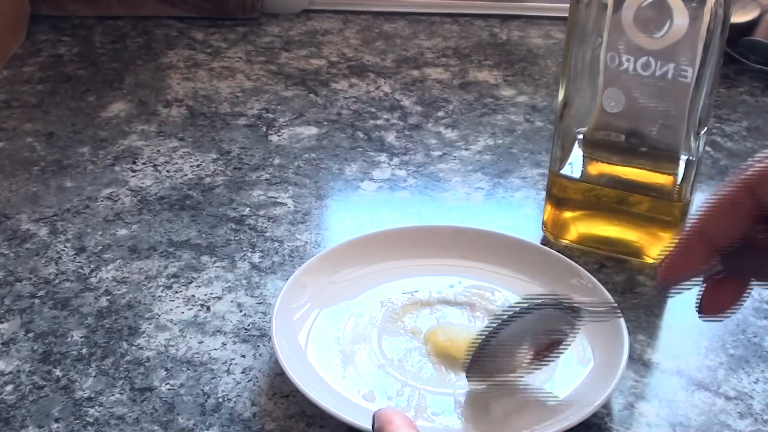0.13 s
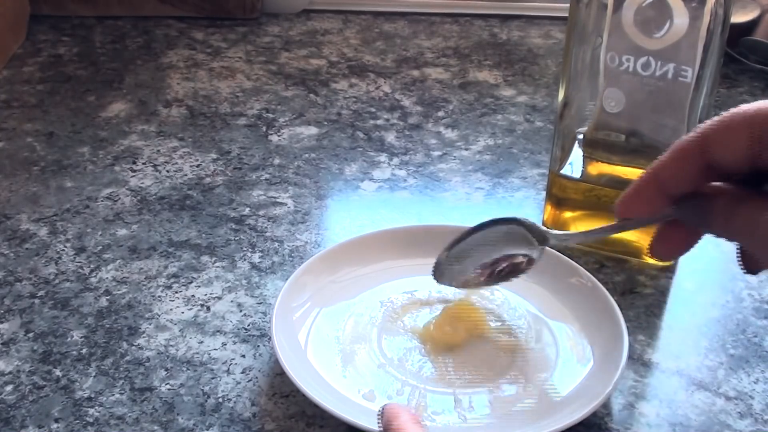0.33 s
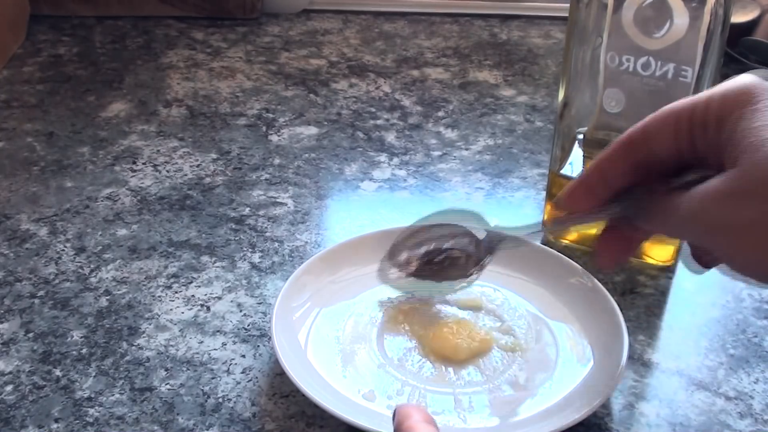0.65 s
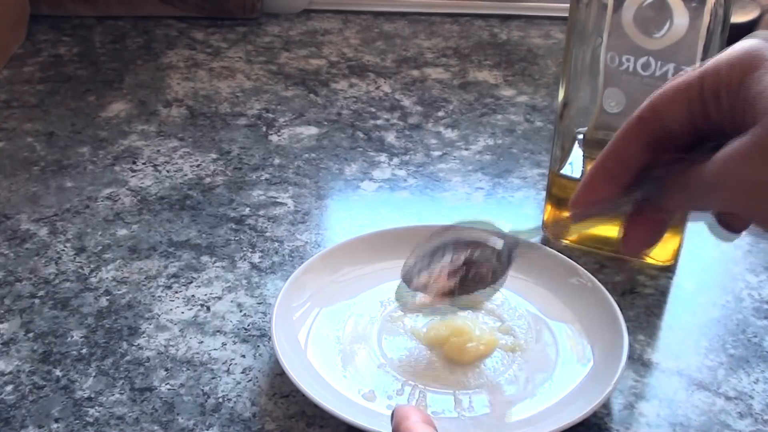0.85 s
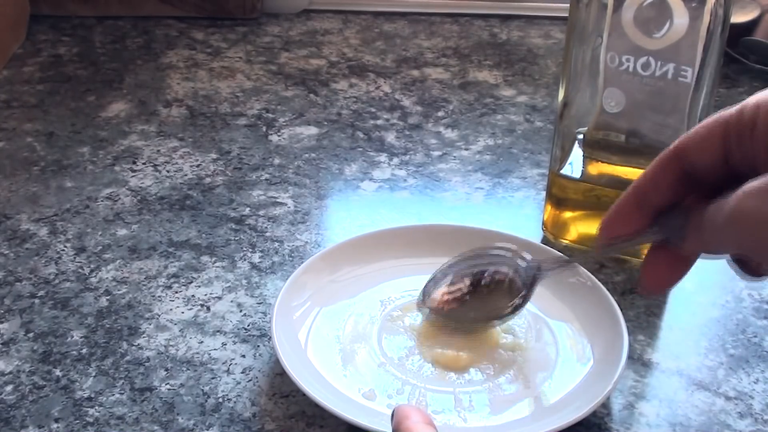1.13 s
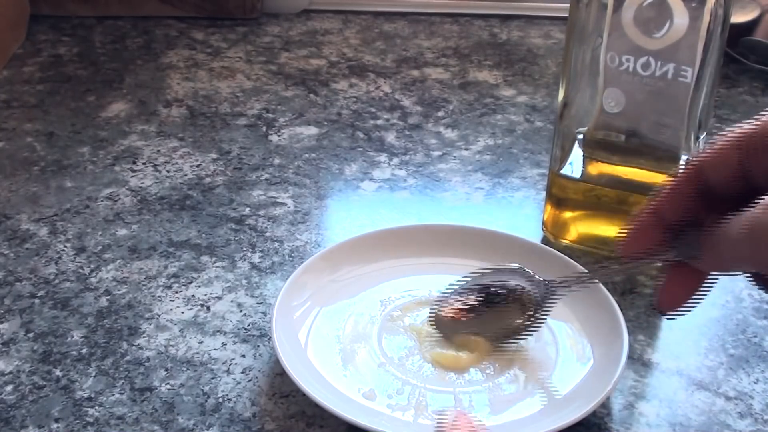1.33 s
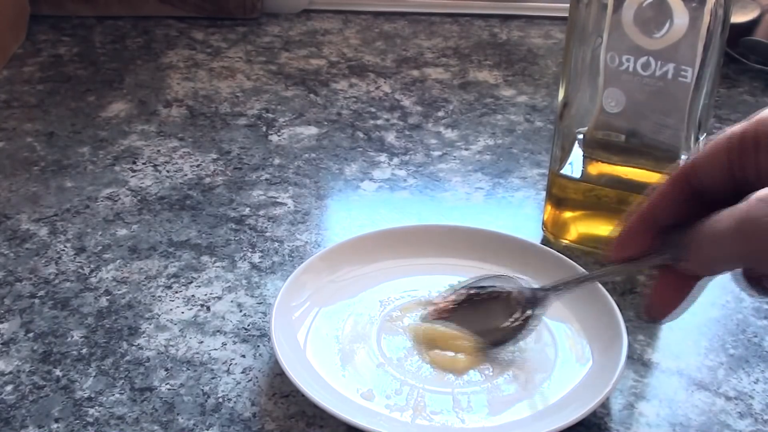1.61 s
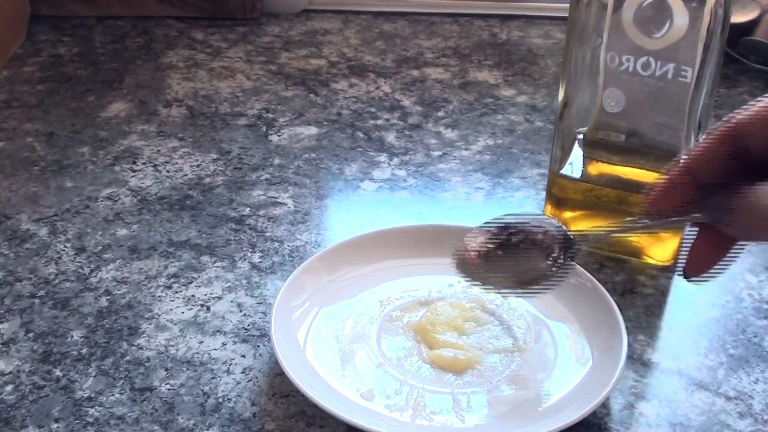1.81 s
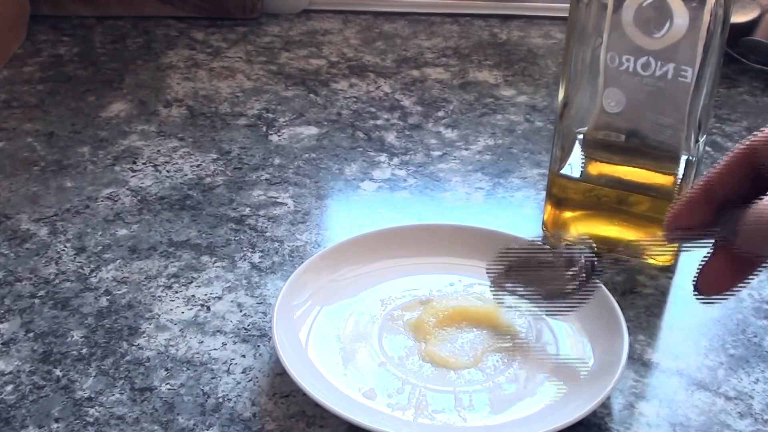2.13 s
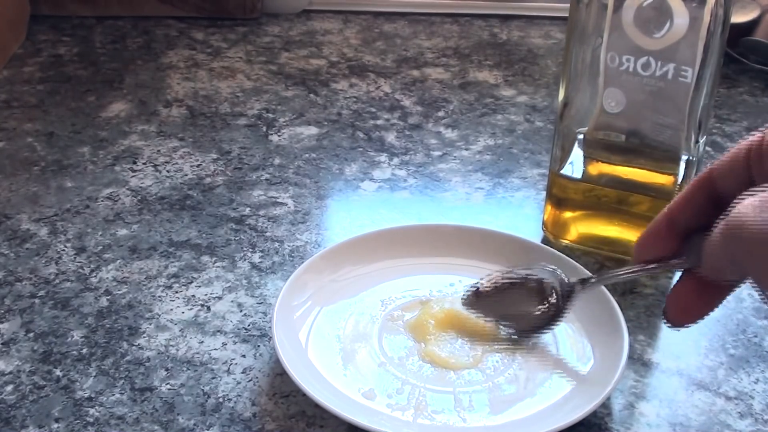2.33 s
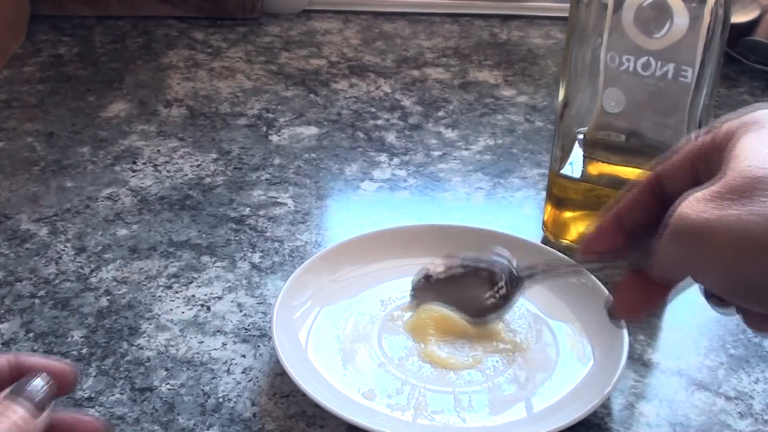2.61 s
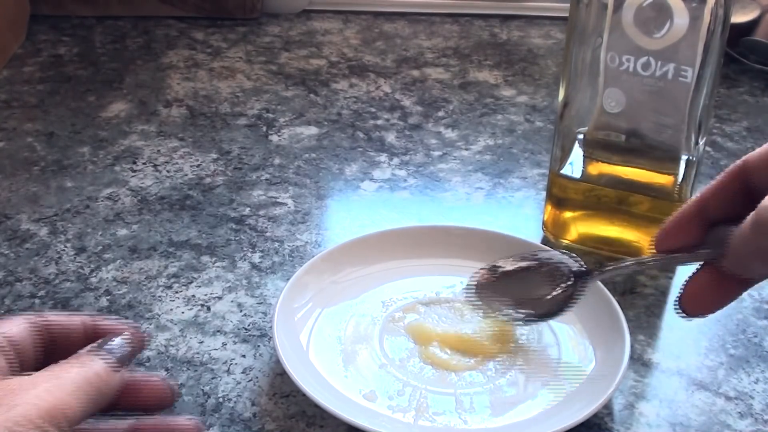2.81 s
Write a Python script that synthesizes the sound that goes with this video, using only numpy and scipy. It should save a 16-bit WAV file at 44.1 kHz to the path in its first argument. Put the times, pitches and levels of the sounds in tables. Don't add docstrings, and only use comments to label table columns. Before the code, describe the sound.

Steel spoon clicking and dragging across a small china saucer, smearing paste, close up

```python
import sys
import numpy as np
from scipy import signal
from scipy.fft import rfft, irfft
from scipy.io import wavfile
from scipy.ndimage import uniform_filter1d

SR = 44100
rng = np.random.default_rng(int(sys.argv[2]) if len(sys.argv) > 2 else 0)


def master_out(mix):
    frames = np.transpose(np.atleast_2d(mix))
    ceiling = np.clip(frames, -1, 1)
    pcm = np.round(ceiling * 32767).astype(np.int16)
    wavfile.write(sys.argv[1], SR, pcm)


def how_loud(loudness_db):
    steps = np.asarray(loudness_db, float) / 20
    return 10 ** steps


N = 130095
LEFT_RIGHT = np.array([[1], [-1]])


def level(x, rms_db):
    return x * how_loud(rms_db) / np.sqrt(np.mean(x ** 2))


def band(x, lo_hz, hi_hz):
    return signal.sosfilt(signal.butter(2, [lo_hz, min(hi_hz, SR / 2.1)], "band", fs=SR, output="sos"), x)


def mode(x, hz, t60_s):
    r = 1000. ** (-1 / (t60_s * SR))
    w = 2 * np.pi * hz / SR
    return signal.lfilter([0, 2 * np.sin(w) * np.sqrt(1 - r)], [1, -2 * r * np.cos(w), r * r], x)


def walk(rate_hz):
    hold = int(SR / rate_hz)
    return uniform_filter1d(np.repeat(rng.standard_normal(N // hold + 1), hold), hold)[:N]


def hump(start_s, length_s, rise):
    sag_db = 10
    u = (np.arange(N) / SR - start_s) / length_s
    rise = np.clip(rise, .02, .95)
    swell = np.clip(np.minimum(u / rise, (1 - u) / 0.26 + 1), 0, 1) ** 0.72
    return swell * how_loud(-sag_db * np.clip(u - rise, 0, 2))


# f/Hz, density/dB per Hz
KITCHEN_SPECTRUM = [(15, -48), (30, -29), (60, -13.5), (227, -1.5), (378, -6), (614, -15.5), (762, -13),
                    (1450, -22), (5730, -27), (15500, -33)]


def kitchen():
    hum_db, side_db = -45, -10.5
    log_hz = np.log(np.maximum(np.fft.rfftfreq(N, 1 / SR), 1))
    table = np.array(KITCHEN_SPECTRUM)
    shape = how_loud(np.interp(log_hz, np.log(table[:, 0]), table[:, 1], left=-70))
    mid, side = level(irfft(rfft(rng.standard_normal((2, N))) * shape, N), hum_db)
    return mid * how_loud(1.13 * walk(4.46)) + how_loud(side_db) * band(side, 400, 7900) * LEFT_RIGHT


def rubbing():
    grit_per_s, grit_spread_db, stutter_db = 6000, 1.6, 1.8
    hiss = rng.standard_normal(N)
    clicks = (rng.random(N) < grit_per_s / SR) * how_loud(grit_spread_db * rng.exponential(1, N)) * np.sign(hiss)
    return level(level(clicks, 0) + 0.54 * hiss, 0) * how_loud(stutter_db * walk(170))


# start t/s, length/s, level/dB, low share/dB, rise share of length
DRAGS = [(-.02, 0.12, -46, 9, .1), (0.201, 0.11, -22.5, -7.5, 0.35), (0.46, 0.023, -24.5, -8, 0.94),
         (0.491, 0.071, -30, -0.5, 0.21), (0.73, 0.095, -18, -5, 0.14), (0.85, 0.12, -49, 12, 0.076),
         (1.059, 0.02, -43.5, -10, 0.4), (1.073, 0.059, -39.5, -5, 0.14), (1.31, 0.055, -39.5, -10, 0.86),
         (1.379, 0.037, -44, 0, 0.63), (1.561, 0.11, -41, -4.5, 0.81), (2.032, 0.08, -41.5, -7.5, 0.18),
         (2.325, 0.056, -32, -3.5, 0.91), (2.638, 0.076, -28.5, -7.5, 0.19)]


def drags(rub):
    drag_db, low_share_db = -1.5, 4.5
    high, low = np.zeros(N), np.zeros(N)
    for start_s, length_s, db, low_db, rise in DRAGS:
        force = hump(start_s, length_s, rise) * how_loud(db + drag_db) * rub
        high += force
        low += force * how_loud(low_db + low_share_db)
    return high, low


# start t/s, length/s
ROCKS = [(-.02, .09), (.21, .09), (.21, .09), (-.02, .1), (.44, .095), (.745, .06), (.735, .1), (1.6, .075),
         (2.305, .09), (2.645, .055), (.21, .09), (.735, .1), (.735, .1), (-.02, .1)]
# level/dB, centre f/Hz
RUMBLES = [(-39, 1230), (-24, 2040), (-29.5, 3100), (-43, 1720), (-34.5, 620), (-32.5, 387), (-33, 1660),
           (-40, 770), (-36, 754), (-32, 795), (-32.5, 4230), (-36, 2600), (-37.5, 4460), (-47, 5400)]


def rocking(rub):
    out = np.zeros(N)
    for (start_s, length_s), (db, hz) in zip(ROCKS, RUMBLES):
        grind = band(hump(start_s, length_s, 0.24) * rub, hz * 0.6, hz * 1.59)
        out += how_loud(db + 14.0) * band(grind, hz * 0.61, hz * 1.504)
    return out


# t/s, level/dB, low share/dB, chatter/ms, ring/dB
TAPS = [(.2060, 2, -44, 4.1, 3.5), (.4382, 2, -21, 2.5, -18), (.4415, -1.5, -5, 2.6, 6),
        (.4762, 3.5, -20, 1.6, -4), (.4803, -1.5, -16, 4.2, 4), (.7303, -1.5, -26, 2.8, 0),
        (.8495, -1.5, -13, 3.1, -22), (1.0795, -7.5, -24, 4.1, -21), (1.083, -7.5, -8, 4.4, -0.5),
        (1.3445, -12, -27, 7.6, -18), (1.3525, -11.5, -9, 5.6, -26), (1.362, -12.5, -7.5, 3, -14),
        (2.3015, -10, -17, 4.7, 6), (2.3545, -10.5, -11, 2.2, -8), (2.3635, -6.5, -16, 1.8, -9),
        (2.379, -11, -12, 2.1, -13), (2.6262, -3, -19, 1.9, 5), (2.6498, -7.5, -6, 2, 11),
        (2.6605, -6.5, -20, 0.68, -16), (2.670, -7, -12, 2.5, 1)]
# t/s, level/dB, low share/dB, chatter/ms
TICKS = [(.2325, -24, -19, 2.3), (0.2543, -3.5, -7, 3.3), (0.2668, -7, -28, 8.2), (.3045, -14, -24, 1.1),
         (.5125, -34, -11, 1.5), (0.5269, -10.5, -13, 2.3), (1.196, -39, -20, 0.49),
         (1.6066, -18.5, -21, 3.3), (1.63, -19, 0, 0.92), (1.656, -21.5, -5, 2.9), (1.717, -25.5, -5, 0.63),
         (2.0472, -16.5, -31, .8), (2.127, -32, -19, 1.1), (2.307, -15, 1.5, 5.2), (2.3393, -23, -30, 1.1),
         (2.4322, -16, -40, 0.4), (2.4693, -33, -18, 1.1), (2.6805, -7, -4.5, 1.55), (2.694, -21, -12, 1.2),
         (2.845, -40, -18, .5), (0.8467, -4.5, -18, 1.1), (1.0975, -24, -2, 1.8)]


def strikes():
    tap_db, scatter_db, tick_ring_db, spots = -18.5, 3, -8, 30
    t = np.arange(int(.02 * SR)) / SR
    hits = []
    for s, db, low_db, chatter_ms, ring_db in list(TAPS) + [(*tick, tick_ring_db) for tick in TICKS]:
        spot_db = scatter_db * rng.standard_normal(spots)
        chatter = np.sign(rng.standard_normal(len(t))) * np.exp(-(t * 1000 / max(chatter_ms, .2)) ** 2)
        burst = (1.63 * (t == 0) + chatter) * how_loud(db + tap_db)
        hits.append((int(s * SR), burst, low_db, ring_db, spot_db))
    return hits


def drive(hits, drag, spot, low, tap_db, drag_db, ring=False):
    x = drag[low] * how_loud(drag_db)
    for start, burst, low_db, ring_db, spot_db in hits:
        gain_db = tap_db + spot_db[spot] + low * (low_db + 12)
        if ring:
            x[start] += 4 * burst[0] * how_loud(gain_db + ring_db)
        else:
            x[start:][:len(burst)] += burst * how_loud(gain_db)
    return x


# f/Hz, level/dB, t60/s
LOW_BODY = [(637, -24, 0.11), (783, -6.5, 0.051), (823, -6, 0.084), (1015, -9.5, 0.022),
            (1243, -7.5, 0.0082), (1456, -19, 0.057), (1850, -20, 0.09), (1805, -8, 0.038),
            (2220, -10, 0.0064), (2550, -14.5, 0.0055)]
# f/Hz, level/dB, t60/s
HIGH_BODY = [(4280, -6.5, 0.0024), (5490, -19, 0.02), (5780, -5.5, 0.026), (5817, 2.5, 0.024),
             (5920, 1, 0.0091), (6910, -3, 0.011), (7620, -8, 0.031), (8540, -2, 0.032), (9900, -14, 0.036),
             (11800, -39, .03)]


def body(hits, drag):
    out = np.zeros(N)
    for k, (hz, db, t60_s) in enumerate(LOW_BODY + HIGH_BODY):
        out += how_loud(db - 9) * mode(drive(hits, drag, k, int(hz < 3000), -5.5, 0), hz, t60_s)
    return out


# f/Hz, level/dB, t60/s
RINGS = [(3572, -13, .09), (3615, -16, .06), (5365, -19, .12), (6225, -21, .1), (7197, -18, .13),
         (9243, -22, .1), (1665, -15, .17)]


def rings(hits, drag):
    ring_db = 4
    out = np.zeros(N)
    for k, (hz, db, t60_s) in enumerate(RINGS):
        force = drive(hits, drag, 20 + k, 0, 3.1, -0.33, ring=True)
        out += how_loud(db - 7.5 + ring_db) * mode(force, hz, t60_s) * how_loud(2 * walk(60))
    return out


# f/Hz, level/dB, t60/s
CLACK = [(1897, -13, 0.049), (4320, -22, 0.0089), (5610, -3.5, 0.024), (6250, 0, 0.0037),
         (7880, -0.5, 0.0039), (9750, -12, 0.021), (12800, -12, 0.0073)]


def clack(hits, drag):
    out = np.zeros(N)
    for k, (hz, db, t60_s) in enumerate(CLACK):
        out += how_loud(db) * mode(drive(hits, drag, 3 * k + 1, int(hz < 3000), 0.1, -58), hz, t60_s)
    return out


def contact():
    crack_db, thud_db, dull_hz = -29, -6.5, 10300
    rub = rubbing()
    drag, hits = drags(rub), strikes()
    out = how_loud(crack_db) * band(drive(hits, drag, 29, 0, 5.2, -.5), 3150, 10000)
    out += how_loud(thud_db) * band(drive(hits, drag, 28, 1, 0.15, -0.063), 500, 2300)
    out += body(hits, drag) + rings(hits, drag) + clack(hits, drag) + rocking(rub)
    out = signal.sosfilt(signal.butter(2, dull_hz, fs=SR, output="sos"), out)
    out += band(drive(hits, drag, 29, 0, -12, -37), 10000, 17000)
    return signal.sosfilt(signal.butter(4, 380, "high", fs=SR, output="sos"), out)


# t/s, f/Hz, level/dB, t60/s
PINGS = [(.2062, 5840, -12, 0.052), (.2062, 3740, -13, 0.026), (.2062, 7930, -9, .012),
         (.4385, 7620, -13, 0.011), (.4385, 9720, -16.5, 0.016), (.4415, 2175, -18, 0.026),
         (.4415, 4360, -15.5, 0.018), (.4415, 9200, -37, 0.092), (.4415, 600, -23.5, .12),
         (.4805, 10100, -15, 0.0098), (.4805, 1783, -22, 0.051), (.4805, 6010, -10, 0.021),
         (.5125, 1860, -24.5, 0.043), (.5125, 700, -28.5, 0.064), (.7305, 5340, -7, 0.017),
         (.7305, 10050, -18, 0.022), (.7305, 7200, -23, 0.062), (.8468, 5920, -6.5, 0.012),
         (.8497, 5920, -19, .015), (.8505, 5340, -23, .08), (1.080, 5080, -12.5, 0.0072),
         (1.0815, 2560, -21, 0.014), (1.083, 5750, -22.5, .03), (1.0825, 1240, -29, 0.037),
         (1.085, 9250, -36.5, 0.1), (1.346, 780, -34.5, 0.15), (2.3015, 5300, -14.5, 0.025),
         (2.303, 1823, -26, 0.061), (2.303, 765, -25.5, 0.064), (2.302, 7700, -23, 0.027),
         (2.339, 8200, -27, .012), (2.3545, 5800, -17.5, 0.032), (2.3635, 8730, -18, 0.016),
         (2.364, 1665, -35.5, 0.23), (2.6264, 8080, -4.5, 0.0098), (2.6264, 5380, -11, 0.019),
         (2.6264, 4350, -14, 0.011), (2.6498, 4130, -26, .03), (2.6498, 5240, -19, .02),
         (2.6605, 4830, -15, 0.0053), (2.670, 8150, -21, 0.05), (2.046, 3585, -39.5, 0.084),
         (2.627, 3588, -27.5, 0.27), (.734, 3570, -24, 0.23), (.481, 3624, -30, 0.24),
         (1.3445, 3598, -31.5, 0.12), (1.353, 7197, -32.5, 0.2), (.779, 376, -24, 0.094),
         (1.608, 764, -35, 0.088), (1.717, 7900, -30, .004)]


def pings():
    rise_s = 0.00025
    out, t = np.zeros(N), np.arange(int(.25 * SR)) / SR
    for (s, hz, db, t60_s), turn in zip(PINGS, rng.random(len(PINGS))):
        envelope = (1 - np.exp(-t / rise_s)) * how_loud(db - 60 * t / t60_s)
        out[int(s * SR):][:len(t)] += envelope * np.sin(2 * np.pi * (hz * t + turn))
    return out


# start t/s, length/s, level/dB, centre f/Hz, gap song/dB
SMEARS = [
    (1.69, 0.1, -43.5, 7700, -16),
    (1.84, 0.096, -39, 5630, -16),
    (1.965, 0.16, -38.5, 7560, -2.5),
    (2.4, 0.24, -42.5, 6950, -14),
    (2.7, 0.22, -47.5, 8160, -8),
]


def paste():
    gap_hz, gap_rise_hz_per_s, gap_width_hz, gap_rms_db = 5000, 9000, 350, -4
    hiss = rng.standard_normal(N) * how_loud(1.4 * walk(55))
    ticks = 4 * (rng.random(N) < 150 / SR) * rng.standard_normal(N)
    wet = hiss + ticks
    narrow = level(band(wet, 20, gap_width_hz), gap_rms_db)
    out, t = np.zeros(N), np.arange(N) / SR
    for s, length_s, db, hz, gap_db in SMEARS:
        turns = gap_hz * t + gap_rise_hz_per_s * (t - s) ** 2 / 2
        tones = np.sin(2 * np.pi * turns) + 0.34 * np.sin(2 * np.pi * (turns + 2700 * t))
        gap = how_loud(gap_db) * narrow * tones * (np.abs(t - s) < 2 * length_s)
        out += how_loud(db) * hump(s, length_s, 0.37) * (band(wet, hz * 0.63, hz * 1.22) + gap)
    return out


def room(x):
    t60_s, top_t60_s, gap_s, room_db, side_db = 0.54, 0.23, 0.0022, -10.5, -11
    t = np.arange(int(.7 * SR)) / SR
    noise = rng.standard_normal((2, len(t))) * (t > gap_s)
    tail = band(noise, 250, 6640) * how_loud(-60 * t / t60_s)
    tail += band(noise, 4460, 13300) * how_loud(-60 * t / top_t60_s)
    tail /= np.sqrt(np.sum(tail[0] ** 2))
    mid, side = signal.fftconvolve(x[None], tail, axes=1)[:, :N] * how_loud(room_db)
    return mid + how_loud(side_db) * band(side, 1000, 7200) * LEFT_RIGHT


def scene():
    pan_share = 1.5
    near = contact() + paste() + pings()
    spread = how_loud(-20) * band(np.roll(near, 9) - near, 1800, 11000) + near * pan_share / 40.0
    return near + spread * LEFT_RIGHT + room(near) + kitchen()


def roll_off(x):
    return signal.sosfilt(signal.butter(12, 16730, fs=SR, output="sos"), x)


def record(dry):
    top_hz = 15700
    rounded = np.tanh(1.244 * dry) / 1.191
    mix = signal.sosfilt(signal.ellip(8, .2, 50, top_hz, fs=SR, output="sos"), rounded)
    return roll_off(mix)


dry = scene()
out = record(dry)
master_out(out)
```